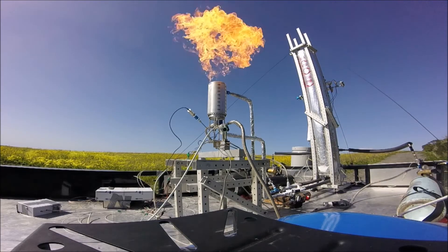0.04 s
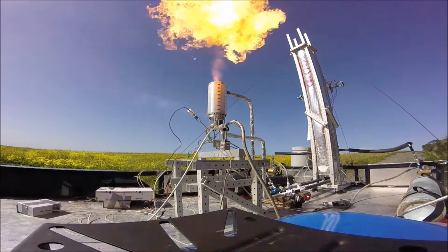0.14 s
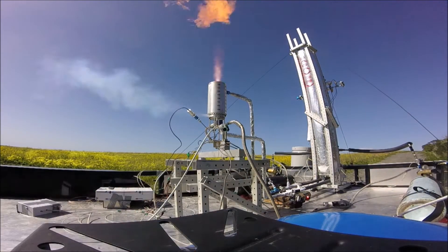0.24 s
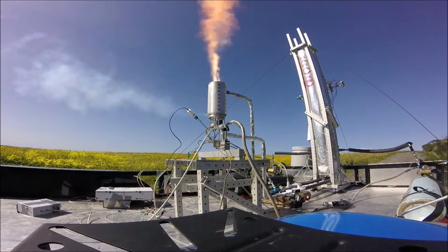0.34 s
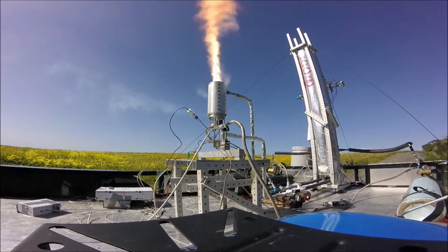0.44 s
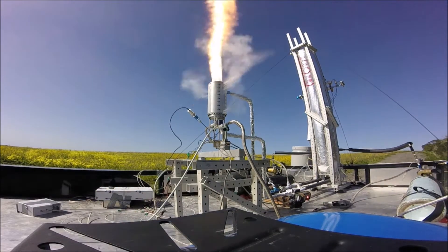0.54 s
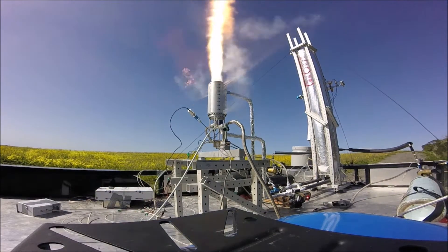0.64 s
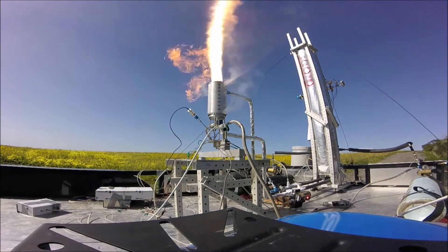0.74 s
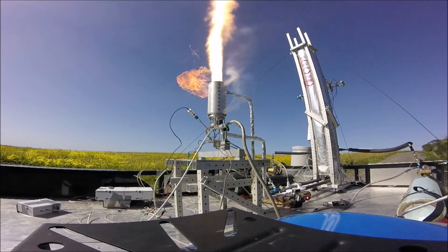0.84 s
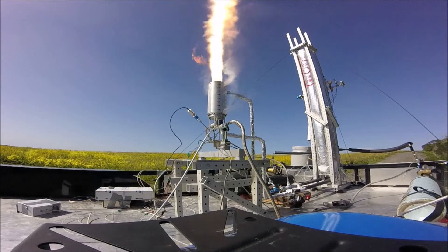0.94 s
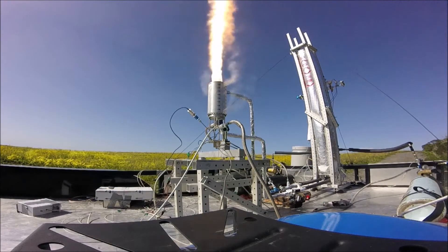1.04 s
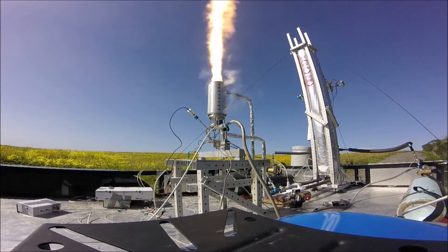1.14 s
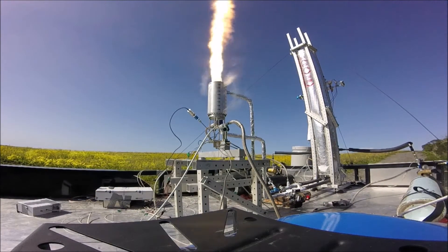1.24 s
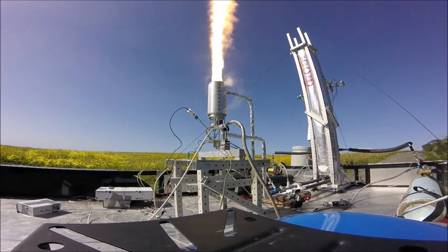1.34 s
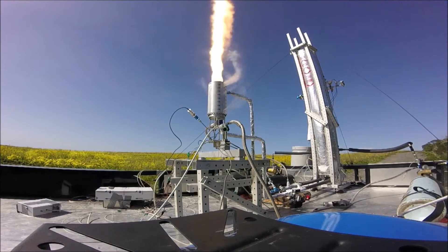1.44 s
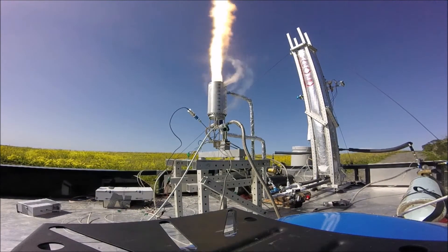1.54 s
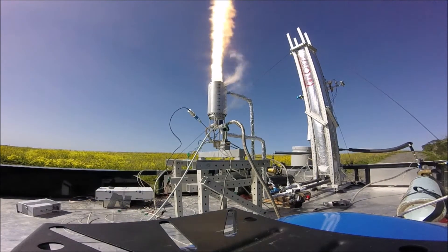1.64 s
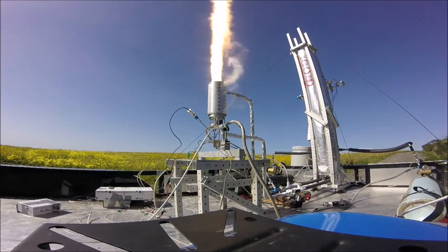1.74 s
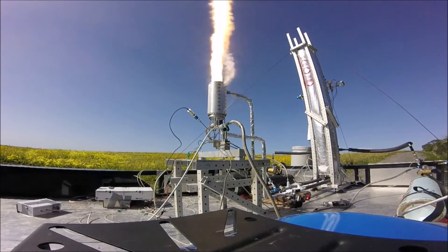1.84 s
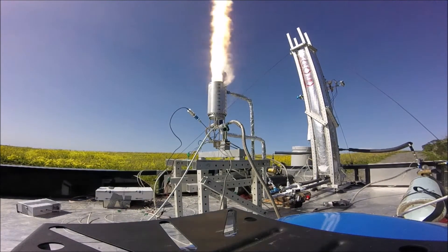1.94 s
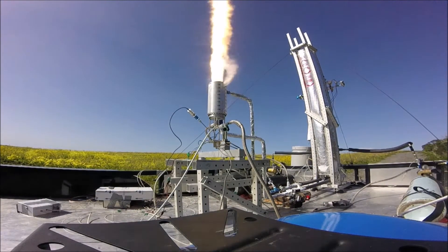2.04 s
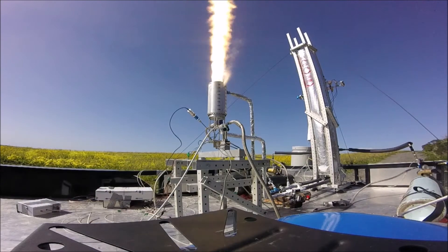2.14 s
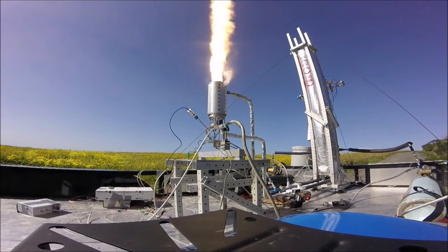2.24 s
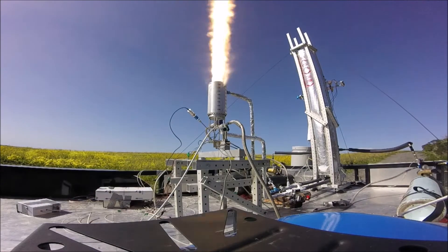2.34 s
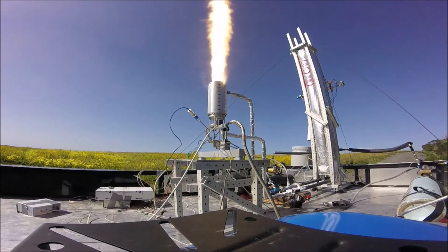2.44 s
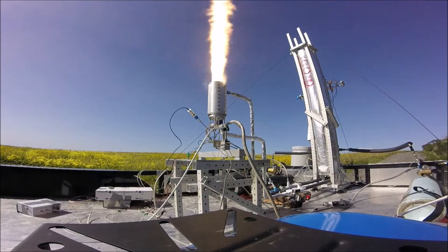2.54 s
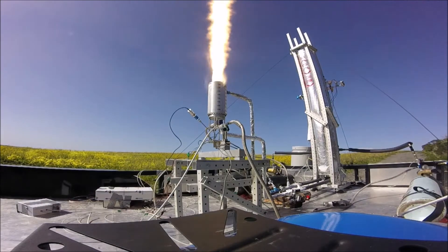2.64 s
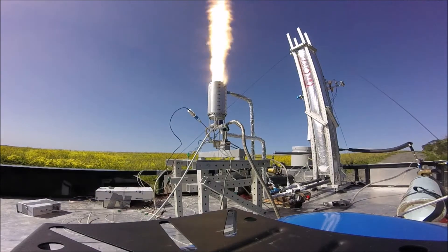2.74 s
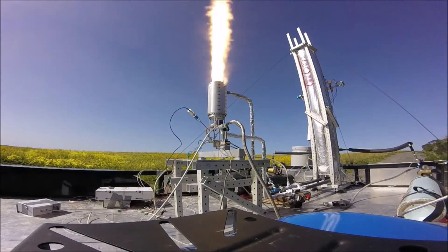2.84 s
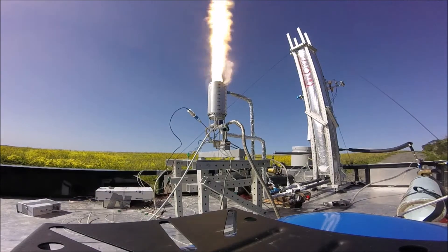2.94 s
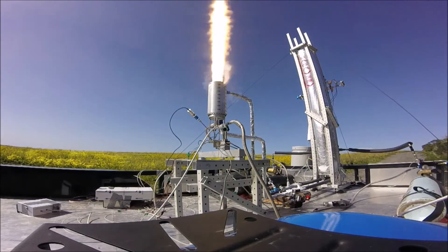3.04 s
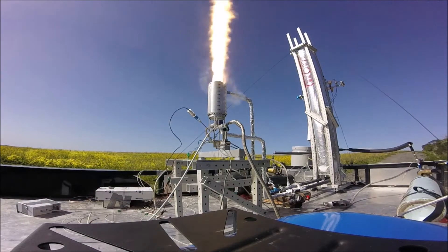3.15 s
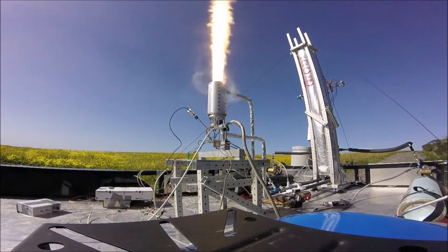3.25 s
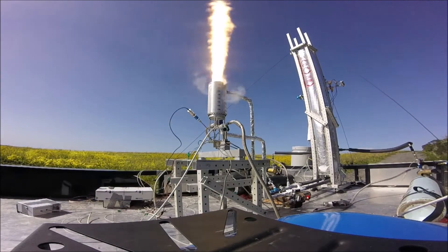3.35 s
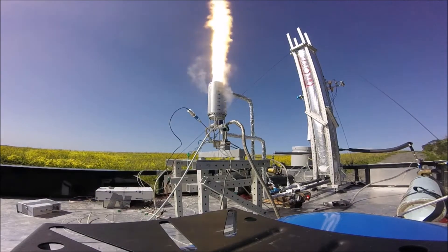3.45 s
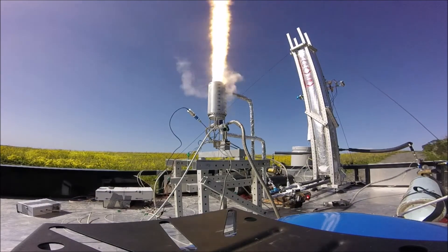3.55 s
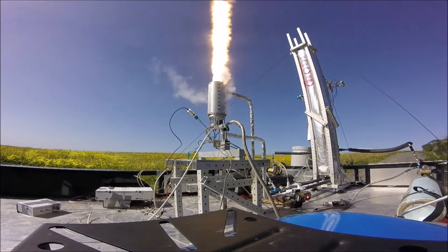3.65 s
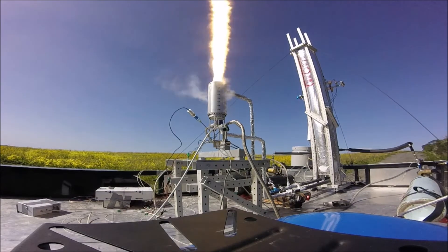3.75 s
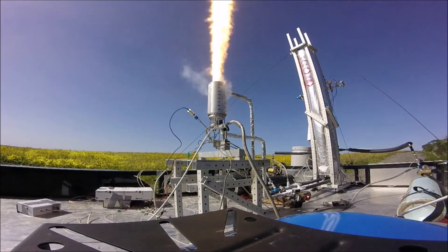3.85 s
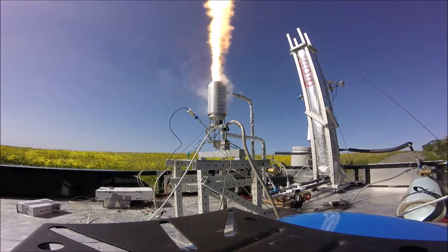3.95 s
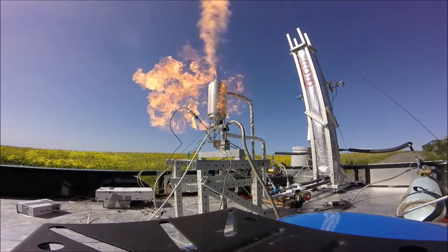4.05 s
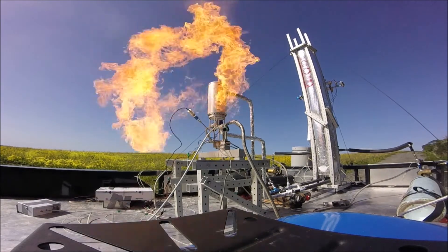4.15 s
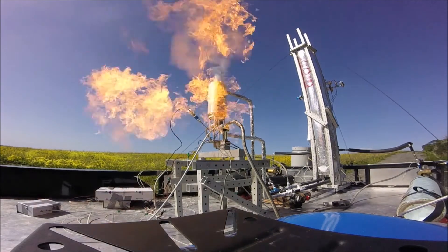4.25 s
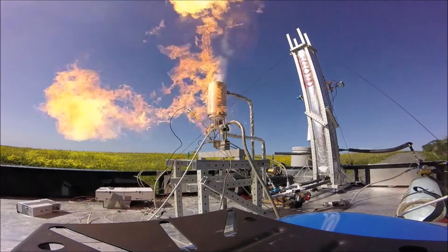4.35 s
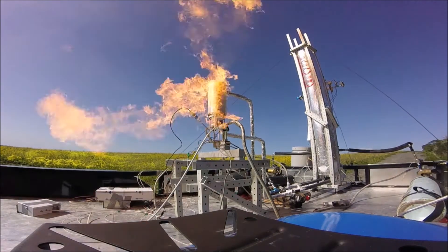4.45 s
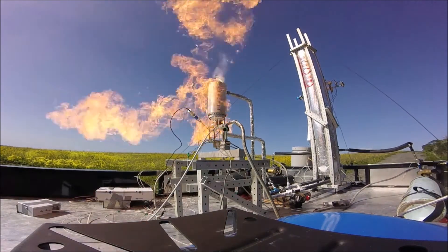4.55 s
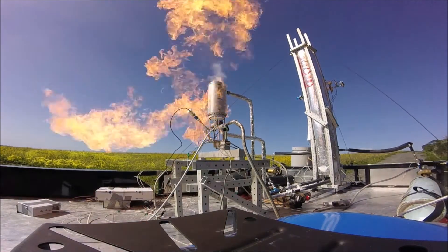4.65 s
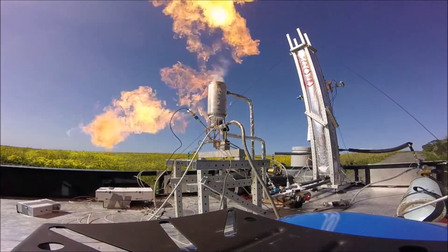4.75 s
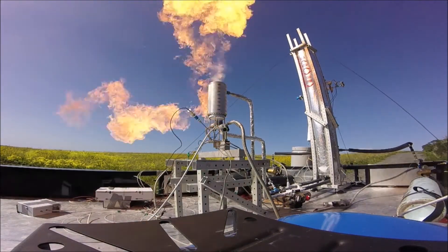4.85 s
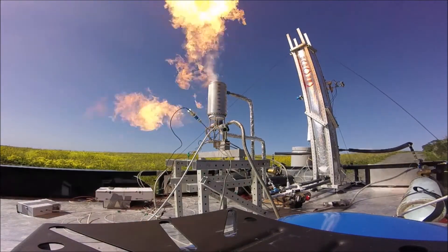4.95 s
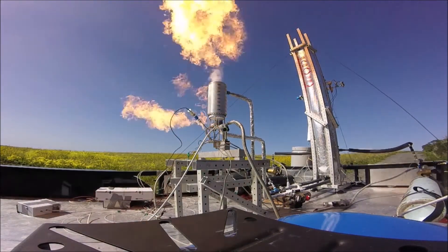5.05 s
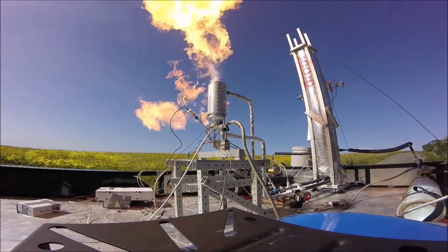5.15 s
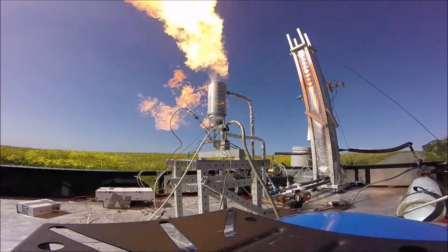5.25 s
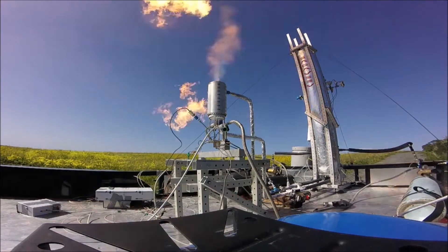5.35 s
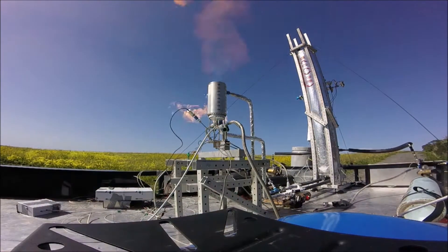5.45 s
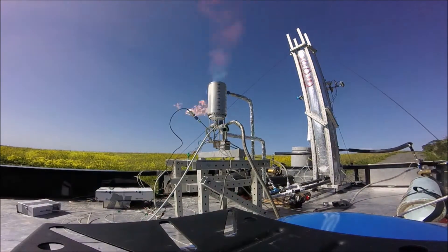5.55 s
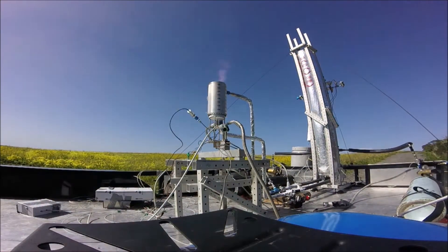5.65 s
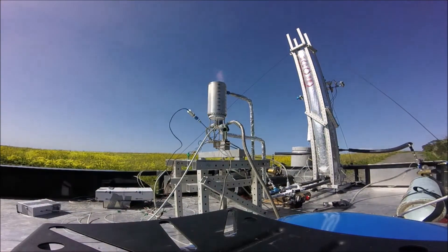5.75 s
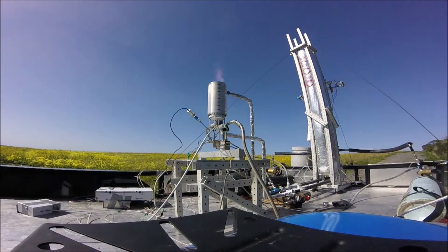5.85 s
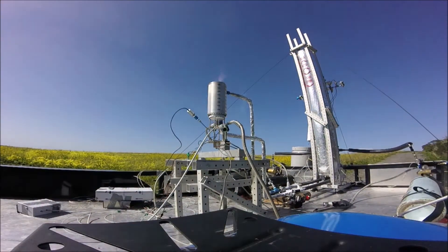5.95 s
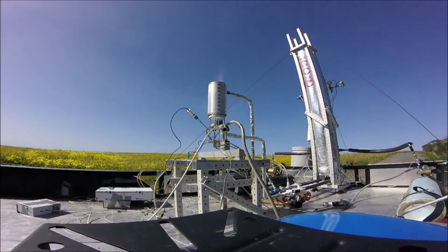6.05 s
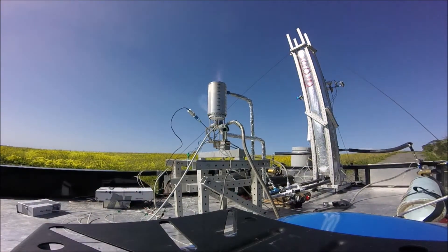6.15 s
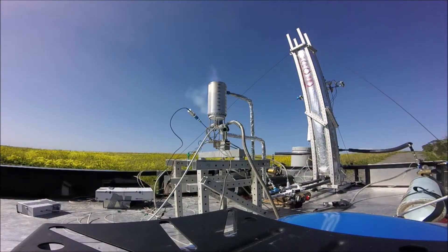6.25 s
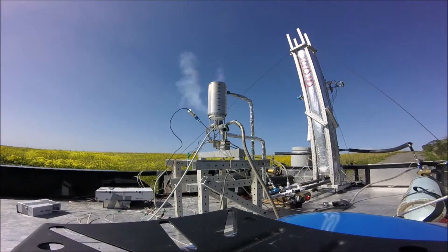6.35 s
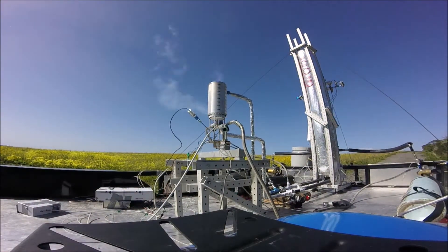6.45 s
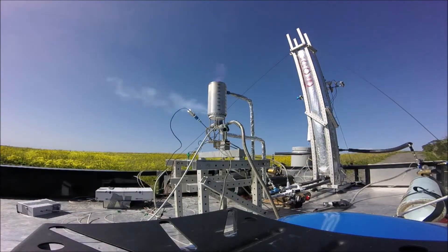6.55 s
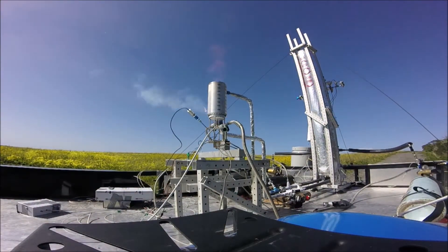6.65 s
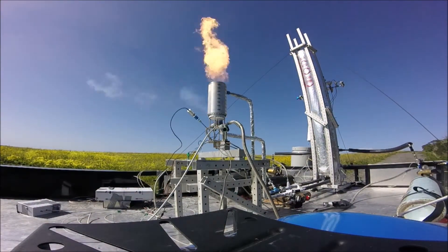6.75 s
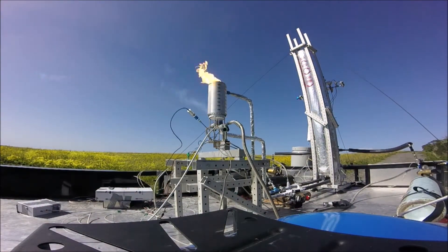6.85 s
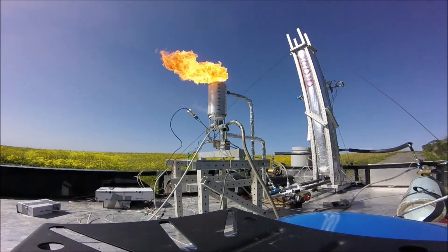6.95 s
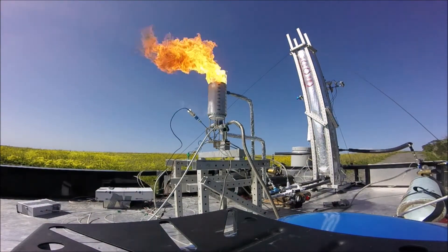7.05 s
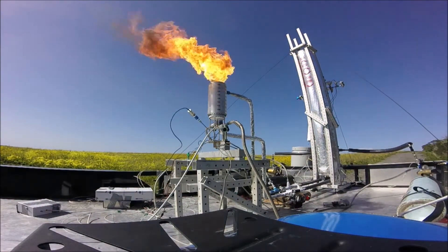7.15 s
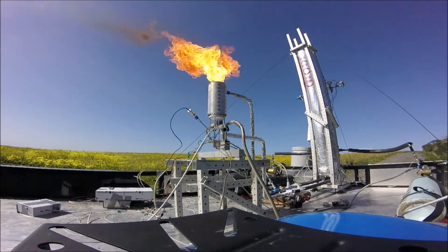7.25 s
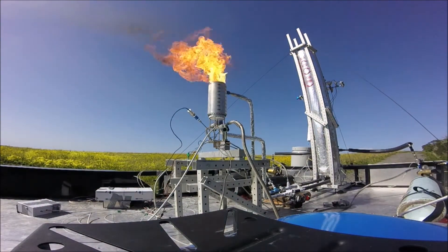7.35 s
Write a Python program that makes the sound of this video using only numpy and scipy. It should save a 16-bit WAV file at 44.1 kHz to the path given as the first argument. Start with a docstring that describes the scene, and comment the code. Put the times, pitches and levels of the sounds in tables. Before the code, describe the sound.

A small rocket engine pops alight outdoors, burns with a hard whistling hiss, then gives way to rumbling flames and venting gas.

```python
"""A small rocket engine fires on an outdoor test stand. Cold gas whistles through the chamber and
squeals at the injector, lights with a pop, and burns as a hard, steady hiss shaped by the chamber's
resonances. After cut-off, spilled fuel billows in the open while purge gas blows through the chamber,
where unburnt fuel flares and pops. Last, the purge valve honks like a reed as it closes, the stand
rings out in its natural modes and a lazy flame flutters on."""
import sys
import numpy as np
from scipy import signal
from scipy.fft import rfft, irfft
from scipy.io import wavfile

SR = 44100
rng = np.random.default_rng(int(sys.argv[2]) if len(sys.argv) > 2 else 0)


def to_wav(s):
    """Save 16-bit WAV."""
    ch = np.atleast_2d(s).T  # columns
    pcm = np.round(np.clip(ch, -1, 1) * 32767)  # PCM
    wavfile.write(sys.argv[1], SR, pcm.astype(np.int16))


N = 326340
TIME = np.arange(N) / SR
FREQS = np.maximum(np.arange(N // 2 + 1) * SR / N, 1)
IGNITION_S, PURGE_S, SHUT_S = 0.169, 4.26, 6.88


def from_db(db):
    """Amplitude ratio of a level in decibels."""
    return 10 ** (np.asarray(db) / 20)


def unit_power(x):
    """Normalisation to a mean square of one."""
    return x / np.sqrt(np.mean(x ** 2) + 1e-20)


def since(start):
    """Seconds elapsed since a moment, zero before it."""
    return np.maximum(TIME - start, 0)


def curve(rows):
    """Linear interpolation of (time, value) rows at every sample."""
    return np.interp(TIME, *np.transpose(rows))


def envelope(start, rise, end, t60):
    """Quadratic rise to one, a hold until the end, then exponential decay; all times in seconds."""
    attack = np.minimum(since(start) / rise, 1) ** 2
    return attack * from_db(-60 * np.minimum(since(end) / t60, 3))


def drift(corner_hz):
    """Random fluctuation: low-pass noise of unit power."""
    return unit_power(irfft(rfft(rng.standard_normal(N)) / (1 + (FREQS / corner_hz) ** 2), N))


def turbulence(spectrum, resonances=()):
    """Source and filter: unit-power noise with a broad spectrum, lifted at each resonance."""
    hz, db = np.transpose(spectrum)
    shape_db = np.interp(np.log(FREQS), np.log(hz), db)
    for centre_hz, width_hz, lift_db in resonances:
        shape_db += lift_db / (1 + (2 * (FREQS - centre_hz) / width_hz) ** 2)
    return unit_power(irfft(rfft(rng.standard_normal(N)) * from_db(shape_db), N))


def split(x, edges_hz):
    """Division into adjoining frequency bands, each of unit power."""
    spectrum, band = rfft(x), np.searchsorted(edges_hz, FREQS)
    return [unit_power(irfft(spectrum * (band == k), N)) for k in range(len(edges_hz) + 1)]


def flow_tone(hz, jitter, shimmer_db, overtones_db=()):
    """Self-sustained oscillation in a flow, randomly modulated in frequency and amplitude."""
    phase = 2 * np.pi * np.cumsum(hz * (1 + jitter * drift(120))) / SR
    overtones = sum(from_db(db) * np.sin(k * phase) for k, db in enumerate(overtones_db, 2))
    return np.sqrt(2) * (np.sin(phase) + overtones) * from_db(shimmer_db * drift(130))


# Spectrum of quiet outdoor air. Each row: frequency in Hz, relative level in dB.
AIR_SPECTRUM = [(100, -3.5), (420, 1.5), (780, -5.5), (1500, -3), (2500, -9.5), (4500, -21.5), (8700, -26),
                (9800, -38.5), (15000, -61.5)]

def outdoors(rumble_db=-48, swell_db=1.5, air_db=-58):
    """Ambient noise: a wavering low rumble and faint air lie under everything."""
    rumble = turbulence([(20, -28.5), (50, -17.5), (70, 2), (105, 1),
                         (150, -15), (205, -18.5), (260, -42.5), (800, -52)])
    rumble *= from_db(rumble_db + swell_db * drift(4.07))
    return rumble + from_db(air_db) * turbulence(AIR_SPECTRUM)


# Spectrum of the cold gas. Each row: frequency in Hz, relative level in dB.
COLD_SPECTRUM = [(150, -19.5), (400, -3), (530, -5.5), (740, -2.5), (950, 1.5), (2200, -4.5), (3900, -24.5),
                 (4500, -21.5), (5400, -32), (9000, -25.5), (11000, -32.5), (15000, -40.5)]
# Resonances of the cold chamber. Each row: centre in Hz, width in Hz, lift in dB.
COLD_RESONANCES = [(1452, 340, 22), (2631, 184, 12.5), (3294, 830, 24), (3855, 240, 18), (4156, 170, 15.5),
                   (5940, 1300, 23), (6850, 770, 8), (8600, 1240, 19), (12250, 1300, 10)]
# Narrow resonances of the stand. Each row: centre in Hz, width in Hz, lift in dB.
STAND_RESONANCES = [(194, 24, 6), (437, 29, 7), (973, 26, 5), (1027.5, 16, 10.5), (1160, 53, 8.5),
                    (1730, 13, -1), (1926, 7.5, 9.5), (2388, 100, 6.5)]

def cold_gas(sputter_db=1.13, sputter_hz=45, waver_db=1.0):
    """Forced resonance: sputtering unlit gas excites chamber and stand, heard in three bands."""
    gas = turbulence(COLD_SPECTRUM, COLD_RESONANCES + STAND_RESONANCES)
    whistle, hiss, top = split(gas, [1900, 4700])
    whistle *= from_db(waver_db * drift(25))
    return np.array([whistle, hiss, top]) * from_db(sputter_db * drift(sputter_hz))


def priming(whistle_db=-27, hiss_db=-27, top_db=-32, rush_db=9, rush_t60=0.3, spit_db=1.5):
    """Starting transient: gas rushes into the empty chamber, then spits unevenly until it lights."""
    whistle, hiss, top = cold_gas()
    rush = from_db(rush_db * from_db(-60 * since(0.018) / rush_t60))
    top *= from_db(top_db + spit_db * drift(50))
    gas = whistle * from_db(whistle_db) + rush * (hiss * from_db(hiss_db) + top)
    thin = signal.sosfilt(signal.butter(3, 1200, "high", fs=SR, output="sos"), gas)
    hollow = signal.lfilter(*signal.iirnotch(2500, Q=3.4, fs=SR), thin)
    return hollow * envelope(0, rise=0.001, end=IGNITION_S, t60=0.012)


def chamber_note(first_hz=1545, locked_hz=1420, lock_s=0.05, level_db=-13.5, growth_db_per_s=55):
    """Lock-in: the gas tone sinks on to the chamber's lowest resonance and grows until ignition."""
    hz = locked_hz + (first_hz - locked_hz) * np.exp(-TIME / lock_s)
    gain = from_db(level_db - growth_db_per_s * np.maximum(IGNITION_S - TIME, 0))
    note = flow_tone(hz, jitter=0.028, shimmer_db=3, overtones_db=[-28])
    return note * gain * envelope(0, rise=0.045, end=IGNITION_S, t60=0.01)


# Injector squeals. Each row: start and end in seconds, initial pitch in Hz, initial level in dB.
INJECTOR_SQUEALS = [(0, .095, 6200, -20.5), (.138, .17, 6200, -23.5)]

def squeals(sag_hz_per_s=5200, fade_db_per_s=85):
    """Flow-induced oscillation at the injector as pressure comes up; each squeal sags and fades."""
    out = np.zeros(N)
    for start, end, hz, db in INJECTOR_SQUEALS:
        age = np.minimum(since(start), end - start)
        tone = flow_tone(hz - sag_hz_per_s * age, jitter=0.018, shimmer_db=3.5)
        out += tone * from_db(db - fade_db_per_s * age) * envelope(start, 0.0077, end, t60=0.04)
    return out


# Spectrum of the hot jet. Each row: frequency in Hz, relative level in dB.
JET_SPECTRUM = [(40, -31.5), (150, -17.5), (330, -5), (530, -13), (900, -7), (2200, 0), (3500, -.5),
                (4800, -12.5), (8000, -15), (11000, -17.5), (15000, -26)]
# Resonances of the hot chamber. Each row: centre in Hz, width in Hz, lift in dB.
HOT_RESONANCES = [(1456, 380, 20.5), (2642, 424, 9), (3231, 450, 14), (3775, 157, 12), (4236, 290, 8),
                  (5865, 1010, 16.5), (6980, 510, 8.5), (8565, 1700, 16), (12900, 750, 5.4)]
# The main burn and a spurt at cut-off. Each row: start, rise, end and 60 dB decay time in seconds.
BURN_SPANS = [(.166, .008, 4.083, 0.48), (4.165, 0.079, 4.255, 0.093)]

def burn(roar_db=-37.5, whistle_db=-22, hiss_db=-16, lag_db=-11, build_s=0.073,
         overshoot_db=10, settle_s=0.057, waver_db=0.8, flutter_db=0.58):
    """Jet noise drives the chamber resonances, and uneven combustion modulates its amplitude."""
    age = since(IGNITION_S)
    jet = turbulence(JET_SPECTRUM, HOT_RESONANCES + STAND_RESONANCES)
    roar, whistle, hiss = split(jet, [900, 1900])
    roar *= from_db(roar_db + lag_db * np.exp(-age / build_s))
    whistle *= from_db(whistle_db + overshoot_db * np.exp(-age / settle_s) + waver_db * drift(6.6))
    throttle = sum(envelope(*span) for span in BURN_SPANS)
    flutter = from_db(flutter_db * drift(28))
    return (roar + whistle + hiss * from_db(hiss_db)) * throttle * flutter


# The pop at ignition, then a later pop of unburnt fuel in the chamber. Each row: start in seconds, body level
# in dB, length in seconds, level of the high crack in dB relative to the body.
COMBUSTION_POPS = [(.170, -8.5, .0035, -5.5), (5.385, -4.5, .005, -5)]

def pops(rise_s=0.00047, t60=0.007):
    """Impulsive combustion: the mixture goes off at once in milliseconds of violent pressure."""
    spectrum = [(40, -27), (330, 5), (700, -3.5), (1400, -4.5),
                (3200, 5.5), (4800, -9.5), (8000, -7.5), (15000, -36)]
    body, crack = split(turbulence(spectrum, resonances=[(1446, 120, 26)]), [1900])
    out = np.zeros(N)
    for start, db, length, crack_db in COMBUSTION_POPS:
        blast = body + from_db(crack_db) * crack
        out += blast * from_db(db) * envelope(start, rise_s, start + length, t60)
    return out


def hoot(peak_s=0.61, half_width_s=0.041, hz=197, level_db=-31):
    """Gaussian tone burst: a brief low hoot while the burn settles."""
    swell = np.exp(-((TIME - peak_s) / half_width_s) ** 2)
    return from_db(level_db) * swell * np.sin(2 * np.pi * hz * TIME)


# Blasts of air on the microphone. Each row: start in seconds, nominal level in dB, period in seconds.
AIR_BLASTS = [(0.879, -18, 0.0067), (0.975, -25.5, 0.0062), (5.085, -13.5, 0.0067), (5.382, -21, 0.023)]

def buffets():
    """Heavily damped oscillation: each blast is one swing of pressure and a weaker rebound."""
    out = np.zeros(N)
    for start, db, period in AIR_BLASTS:
        cycles = since(start) / period
        out += from_db(db) * 2 * np.sin(2 * np.pi * cycles) * np.exp(-2.4 * cycles)
    return out


# Spilled fuel catches as the jet dies, and again later. Each row: start and end in seconds, level in dB.
FUEL_CATCHES = [(4.066, 4.24, -33.5), (6.55, 6.828, -43)]

def whooshes(rise_s=0.12, t60=0.2):
    """Unconfined ignition: fuel catches in the open air with a soft, low rush."""
    rush = turbulence([(60, -7), (150, -4), (320, -2), (480, -24), (1500, -50)])
    return rush * sum(from_db(db) * envelope(start, rise_s, end, t60) for start, end, db in FUEL_CATCHES)


# Spectrum of open flame. Each row: frequency in Hz, relative level in dB.
FLAME_SPECTRUM = [(20, -13.5), (50, -10), (72, 5), (100, 3.5), (135, -10), (170, -20), (205, -9.5),
                  (250, -23), (420, -14.5), (800, -51)]
# Fireballs after cut-off, then a lazy last flame. Each row: start and end in seconds, level in dB.
FLAME_SPANS = [(4.164, 4.7, -29.5), (4.684, 5.03, -33.5), (4.99, 5.277, -24), (6.7, 7.4, -47.5)]

def open_flames(rise_s=0.14, t60=0.55, lick_db=-0.5):
    """Combustion noise: spilled fuel burns in the open, rumbling and licking."""
    size = sum(from_db(db) * envelope(start, rise_s, end, t60) for start, end, db in FLAME_SPANS)
    return turbulence(FLAME_SPECTRUM) * size * from_db(lick_db * drift(13.9))


# Purge flow while it only seeps. Each row: time in seconds, hiss level in dB.
SEEP_FLOW = [(4.32, -35.5), (4.476, -30), (4.644, -30.5), (5.27, -29)]
# Purge flow as it opens fully and runs down. Each row: time in seconds, hiss level in dB.
VENT_FLOW = [(5.41, -25.5), (5.496, -29.5), (5.704, -20), (6.146, -21.5), (6.164, -24), (6.308, -22.5),
             (6.566, -26.5), (6.7, -30.5)]

def purge(full_flow_db=-21, whistle_db=-18, whistle_slope=0.6, top_db=-26.5, top_slope=1.55,
          spit_db=7, choke_s=6.82, choke_t60=0.73):
    """Turbulent flow noise: the purge gas grows louder and brighter as more of it flows."""
    whistle, hiss, top = cold_gas()
    flow_db = curve(SEEP_FLOW + VENT_FLOW)
    relative_db = flow_db - full_flow_db
    whistle *= from_db(whistle_db + whistle_slope * relative_db)
    # The closing valve spits once and chokes the top band first.
    hiss *= from_db(flow_db + spit_db * envelope(6.75, rise=0.04, end=6.835, t60=0.046))
    top *= from_db(top_db + top_slope * relative_db - 60 * since(choke_s) / choke_t60)
    return (whistle + hiss + top) * envelope(PURGE_S, rise=0.02, end=6.852, t60=0.14)


# Unburnt fuel flares in the chamber. Each row: start and end in seconds, level in dB.
CHAMBER_FLARES = [(5.073, 5.136, -22), (5.302, 5.337, -10), (5.336, 5.376, -13), (5.53, 5.562, -24.5),
                  (5.594, 5.608, -16), (6.363, 6.412, -20.5)]

def flares(rise_s=0.008, t60=0.064):
    """Confined combustion: rough burns excite mostly the chamber's lowest resonance."""
    spectrum = [(60, -11), (350, -0.5), (750, -8), (1100, 1),
                (2600, -1), (3900, -7), (4700, -31.5), (15000, -52)]
    bursts = sum(from_db(db) * envelope(start, rise_s, end, t60) for start, end, db in CHAMBER_FLARES)
    return turbulence(spectrum, resonances=[(1446, 290, 18.8)]) * bursts


# Pitch of the closing valve. Each row: time in seconds, frequency in Hz.
VALVE_PITCH = [(6.765, 668), (6.805, 580), (6.835, 661.8), (6.859, 609), (6.877, 430), (6.88, 410)]

def valve_honk(level_db=-23.5):
    """Reed oscillation: the closing valve flutters in the flow, giving a rough harmonic tone."""
    reed = flow_tone(curve(VALVE_PITCH), jitter=0.032, shimmer_db=2.6, overtones_db=[-13, -17, -15, -16])
    return reed * from_db(level_db) * envelope(6.75, rise=0.025, end=6.874, t60=0.05)


# Natural modes of the stand. Each row: frequency in Hz, level in dB, 60 dB decay time in seconds.
STAND_MODES = [(212, -59, 2.3), (409, -55.5, 4), (531, -38.5, 1.4), (1570, -57, 2.4), (1790, -54, 1.2),
               (1900, -56, 3.5), (2634, -61, 2.2)]
# Spectrum of the echo from the field. Each row: frequency in Hz, relative level in dB.
ECHO_SPECTRUM = [(150, -20), (300, -12), (550, 4), (780, -9.5), (1200, 6), (1900, -3), (3000, -11),
                 (5000, -36), (12000, -50)]

def ring_out(echo_db=-40, echo_t60=0.69, waver_db=-2.5):
    """Free decay: when the gas stops, the metal's modes ring on and the echo fades over the field."""
    age = since(SHUT_S)
    metal = np.zeros(N)
    for hz, db, t60 in STAND_MODES:
        gain = from_db(db - 60 * age / t60 + waver_db * drift(5.5))
        metal += gain * np.sin(2 * np.pi * hz * age)
    echo = turbulence(ECHO_SPECTRUM) * from_db(echo_db - 60 * age / echo_t60)
    return metal + echo * (TIME > SHUT_S)


def scene():
    """Superposition: engine, flames, valve and outdoor air add in one channel."""
    start_up = priming() + chamber_note() + squeals()
    firing = burn() + pops() + hoot() + buffets()
    afterburn = whooshes() + open_flames() + flares()
    shut_down = purge() + valve_honk() + ring_out()
    return (start_up + firing + afterburn + shut_down + outdoors())[None]


def record(dry, cutoff_hz=15250):
    """Saturation rounds off the loud pops, and a steep low-pass filter removes the highest treble."""
    saturated = dry / (1 + dry ** 8) ** (1 / 8)
    return signal.sosfilt(signal.ellip(10, 0.1, 80, cutoff_hz, fs=SR, output="sos"), saturated)


dry = scene()
out = record(dry)
to_wav(out)
```